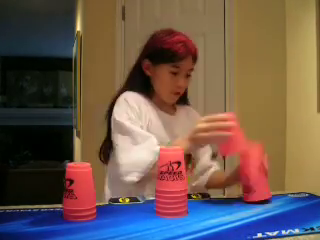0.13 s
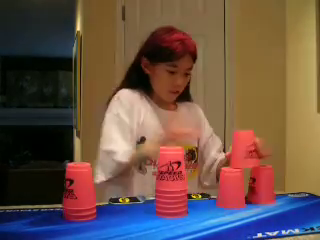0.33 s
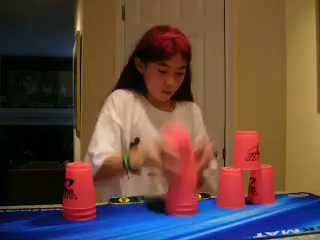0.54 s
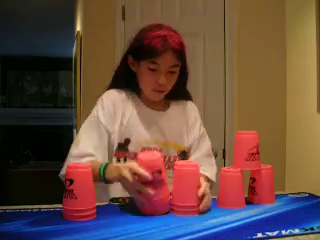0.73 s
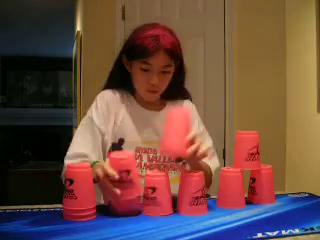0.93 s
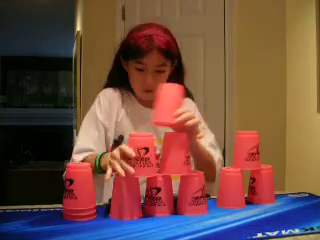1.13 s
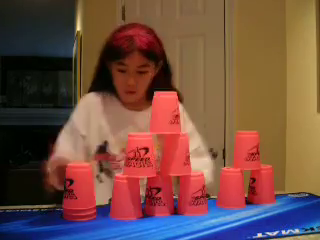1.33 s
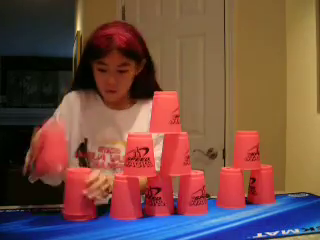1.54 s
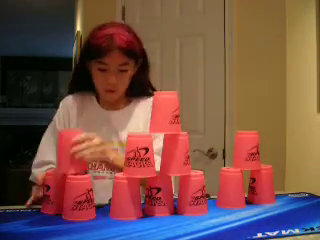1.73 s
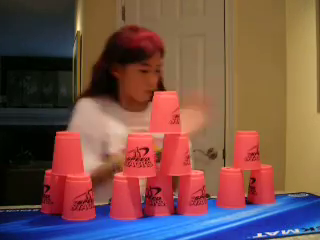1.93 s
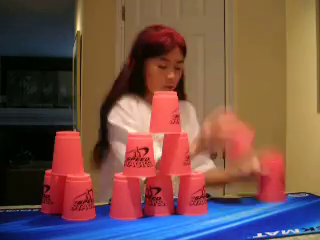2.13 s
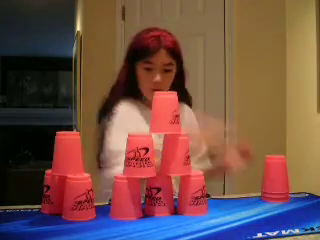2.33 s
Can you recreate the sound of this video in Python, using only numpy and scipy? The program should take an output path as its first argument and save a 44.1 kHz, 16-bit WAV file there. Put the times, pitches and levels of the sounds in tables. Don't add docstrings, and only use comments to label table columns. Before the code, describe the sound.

Hollow plastic cups clack rapidly as they are stacked on a mat in an echoing room.

```python
import sys
import numpy as np
from scipy import signal
from scipy.fft import rfft, irfft, next_fast_len
from scipy.io import wavfile

SR = 44100
rng = np.random.default_rng(int(sys.argv[2]) if len(sys.argv) > 2 else 0)


def decibels_to_gain(level_db):
    exponent = np.asarray(level_db, float) / 20
    return 10 ** exponent


def put_to_file(sound):
    columns = np.atleast_2d(sound).T
    safe = np.clip(columns, -1, 1)
    whole_steps = np.round(safe * 32767)
    wavfile.write(sys.argv[1], SR, whole_steps.astype(np.int16))


N = 110250

# [t/s, peak level/dB, centre of the modes struck f/Hz, their spread/octaves, crack over body level/dB]
SET_DOWN = [(.145, -11, 494, .5, -23), (.148, -0.5, 800, 1.1, -31), (.208, -2, 630.4, 0.11, -25),
            (.347, 7, 780, 0.2, -5.5), (.358, -6, 637, 0.25, -20.5), (.392, -1, 940, 0.71, -8),
            (.529, -13, 800, 1, -15), (.753, -21.5, 1250, 0.52, -20.5), (.775, -19, 590, 0.92, -9.5),
            (.858, -3, 632, 0.11, 1), (.892, -16.5, 641, 0.072, -23), (.955, -23, 606, 0.38, -24),
            (1.073, -1, 742, 0.45, -19), (1.118, 1.5, 877, 0.5, -12), (1.165, -13, 620, 0.42, -19),
            (1.221, -0.5, 890, 0.42, -14), (1.231, -13.5, 923, 0.24, -1), (1.301, 0.5, 939, 0.42, -5.5),
            (1.311, -13, 920, .2, -20.5), (1.642, -22.5, 1297, 1.1, -7.5), (1.723, -32.5, 734, 0.78, 2.5),
            (1.786, -10, 686.5, .17, -21), (1.866, 0.5, 792, 0.34, -5), (1.882, -14, 920, 0.17, -7.5)]
SLAMS = [(2.152, -11.5, 397, 0.77, -37), (2.162, -7.5, 500, 0.93, -37), (2.172, 0.5, 800, 0.55, -34),
         (2.178, -9, 800, 0.36, -9), (2.186, -5.5, 950, 0.32, -13), (2.209, -15.5, 640, 0.54, -2),
         (2.245, -17, 710, 0.33, 8.5), (2.256, -7.5, 705, 0.66, -23), (2.268, 0.5, 1674, 0.39, -6.5),
         (2.284, -12, 1600, 0.23, -23), (2.336, -6, 787, 0.35, -5.5), (2.346, -18, 888, 0.23, 2),
         (2.356, -15, 800, 0.66, 7), (2.385, -4, 1920, 0.67, -7), (2.401, -11.5, 1570, 0.61, -6),
         (2.426, -16, 1494, 0.7, 1.5)]
RATTLE_TIMES = [.091, .142, .170, .192, .201, .224, .236, .244, .260, .56, .76, .855, .90, 1.045, 1.058,
                1.076, 1.082, 1.093, 1.13, 1.19, 1.42, 1.65, 1.77, 1.80, 2.165, 2.205, 2.229, 2.245, 2.336,
                2.354]
# [level/dB, pitch f/Hz, length t/s]
RATTLES = [(-43.5, 1710, 0.015), (-28, 2900, 0.015), (-23.5, 1610, .011), (-21, 3110, 0.01),
           (-25.5, 2300, 0.0089), (-27, 3510, 0.0025), (-28.5, 2810, .0041), (-31.5, 2710, 0.012),
           (-28, 3310, .011), (-40.5, 910, .141), (-42, 1200, .081), (-21.5, 2810, .0041),
           (-42, 1140, .101), (-25.5, 2810, 0.012), (-21, 2740, 0.013), (-17, 2300, .0031),
           (-19, 2840, .0041), (-30, 1900, 0.0097), (-28.5, 1310, 0.057), (-41, 3310, 0.031),
           (-56, 170, 0.23), (-46, 1400, 0.057), (-39, 310, 0.022), (-29.5, 550, 0.059),
           (-31.5, 2710, 0.033), (-28.5, 2770, 0.016), (-27, 3210, .014), (-24.5, 3010, 0.018),
           (-21.5, 2610, 0.013), (-24, 2930, 0.023)]
# [f/Hz, level/dB, time to fall 60 dB t/s]
CUP_MODES = [(371.5, 2, 0.028), (547, -3, .04), (632, 0.5, 0.036), (709.5, 2.5, 0.025), (800, 0.5, 0.036),
             (920, 2, 0.036), (999.4, -1, 0.028), (1143, -3, .03), (1250, -4.5, 0.035), (1278, -5.5, 0.037),
             (1542, 4.5, 0.024), (1588, -7, 0.01), (1834, -3.5, 0.034), (2143, -2.5, 0.027)]
# [f/Hz, time to fall 60 dB t/s]
ROOM_DECAY = [(150, 0.8), (500, 0.83), (900, 0.59), (2000, 0.89), (4000, .4)]
# [f/Hz, level/dB]
ROOM_COLOUR = [(150, 5), (700, 1), (1500, -2), (3000, -3)]
# [delay t/s, level/dB]
NEAR_WALLS = [(.011, -17.5), (.016, -16.5), (.026, -19.5)]
# [f/Hz, level/dB per Hz]
HUM_COLOUR = [(60, -7.5), (200, 0), (600, -1.5), (1500, -3), (3000, -10), (4200, -11.5)]
# [f/Hz, level/dB]
MIC_COLOUR = [(700, 1), (2000, 0.5), (3200, -3), (3900, 0)]

BODY_DB, ATTACK_S = -2, 0.00032
OTHER_MODES_DB = -24
PITCH_SCATTER, LEVEL_SCATTER_DB, PHASE_SCATTER_RAD = .008, 2.5, 1.2
CRACK_DB, CRACK_T60_S, CRACK_HZ, CRACK_WIDTH_HZ = 5, 0.0035, 2560, 2500
TICKS_PER_S, TICK_CYCLES, TICK_SPREAD, TICK_SKIRT = 5000, 4.5, .08, .3
ROOM_DB, ROOM_BUILD_S = -10.5, 0.0043
FAR_WALL_S, FAR_WALL_SPREAD_S, FAR_WALL_GAIN = .042, .01, 0.85
HUM_DB, OLD_ECHO_GAIN, OLD_ECHO_T60_S = -48, 0.5, 0.1
MIC_BASS_HZ, MIC_DAMPING = 241, 0.91
FULL = .71
STEP = FULL / 128
OFFSET = -6 * STEP
EDGE_HZ, EDGE_WIDTH_HZ = 4130, 150


def along(points, hz):
    f, value = np.transpose(points)
    return np.interp(np.log(hz + 1), np.log(f + 1), value)


def filtered(x, response):
    m = next_fast_len(len(x) + 8192)
    spectrum = rfft(x, m) * response(np.fft.rfftfreq(m, 1 / SR))
    return irfft(spectrum, m)[:len(x)]


def peak(hz, width_hz):
    return lambda f: 1j * f * width_hz / (hz * hz - f * f + 1j * f * width_hz)


def knock(db, hz, octaves, crack_db):
    t = np.arange(SR // 10) / SR
    body = np.zeros(len(t))
    for f, level_db, t60 in CUP_MODES:
        fade = decibels_to_gain(level_db + rng.normal(0, LEVEL_SCATTER_DB) - 60 * t / t60)
        struck = decibels_to_gain(OTHER_MODES_DB) + np.exp(-.5 * (np.log2(f / hz) / octaves) ** 2)
        pitch = f * rng.normal(1, PITCH_SCATTER)
        phase = rng.normal(0, PHASE_SCATTER_RAD)
        body += fade * struck * np.sin(2 * np.pi * pitch * t + phase)
    body *= (1 - np.exp(-t * octaves / ATTACK_S)) ** 2
    burst = rng.standard_normal(len(t)) * decibels_to_gain(-60 * t / CRACK_T60_S)
    crack = filtered(burst, peak(CRACK_HZ, CRACK_WIDTH_HZ))
    body = decibels_to_gain(BODY_DB) * body / np.abs(body).max()
    crack = decibels_to_gain(crack_db + CRACK_DB) * crack / np.abs(crack).max()
    return decibels_to_gain(db) * (body + crack)


def rattle(db, hz, length):
    t = np.arange(round(SR * (length * 1.5 + .03))) / SR
    chance, size, side = rng.random((3, len(t)))
    ticks = (chance < TICKS_PER_S / SR) * np.log(size + 1e-9) * np.sign(side - .5)
    ticks = ticks * np.exp(-(t / length) ** 4)
    low = peak(hz * (1 - TICK_SPREAD / 2), hz / TICK_CYCLES)
    high = peak(hz * (1 + TICK_SPREAD / 2), hz / TICK_CYCLES)
    rung = filtered(ticks, lambda f: low(f) * (high(f) + TICK_SKIRT))
    return decibels_to_gain(db) * rung / np.sqrt(np.sum(rung ** 2) / (length * SR))


def in_room(x):
    hz, t, noise = signal.stft(rng.standard_normal(SR * 3 // 4), SR, nperseg=256)
    fade_db = -60 * t / along(ROOM_DECAY, hz)[:, None]
    shaped = noise * decibels_to_gain(along(ROOM_COLOUR, hz)[:, None] + fade_db)
    tail = signal.istft(shaped, SR, nperseg=256)[1]
    t = np.arange(len(tail)) / SR
    far_wall = 1 + FAR_WALL_GAIN * np.exp(-.5 * ((t - FAR_WALL_S) / FAR_WALL_SPREAD_S) ** 2)
    tail = tail * (1 - np.exp(-t / ROOM_BUILD_S)) * far_wall
    tail = decibels_to_gain(ROOM_DB) * tail / np.linalg.norm(tail)
    tail[0] = 1
    for delay, db in NEAR_WALLS:
        tail[round(delay * SR * rng.uniform(.9, 1.1))] += decibels_to_gain(db + rng.normal(0, 2))
    return signal.fftconvolve(x, tail)


def add(track, s, x):
    part = track[round(s * SR):][:len(x)]
    part += x[:len(part)]


def cups():
    out = np.zeros(N)
    for s, *blow in SET_DOWN + SLAMS:
        add(out, s, in_room(knock(*blow)))
    for s, scrape in zip(RATTLE_TIMES, RATTLES):
        add(out, s, in_room(rattle(*scrape)))
    return out


def hum():
    x = filtered(rng.standard_normal(N), lambda hz: decibels_to_gain(along(HUM_COLOUR, hz)))
    old_echo = OLD_ECHO_GAIN * decibels_to_gain(-60 * np.arange(N) / SR / OLD_ECHO_T60_S)
    return decibels_to_gain(HUM_DB) * x / x.std() * (1 + old_echo)


def scene():
    return (cups() + hum())[None]


def mic(hz):
    u = hz / MIC_BASS_HZ
    bass_loss = -u * u / (1 - u * u + 1j * MIC_DAMPING * u)
    return decibels_to_gain(along(MIC_COLOUR, hz)) * bass_loss


def band_limit(x):
    return signal.sosfilt(signal.butter(12, 16800, fs=SR, output="sos"), x)


def record(dry):
    low = signal.resample_poly(filtered(dry[0], mic), 80, 441)
    low = STEP * np.round(np.clip(low + OFFSET, -FULL, FULL) / STEP) - OFFSET
    x = signal.resample_poly(low, 441, 80, window=("kaiser", 12))
    x = filtered(x, lambda hz: .5 - .5 * np.tanh((hz - EDGE_HZ) / EDGE_WIDTH_HZ))
    x = np.clip(x + OFFSET, -FULL, FULL)
    return band_limit(x[None, :N])


dry = scene()
out = record(dry)
put_to_file(out)
```